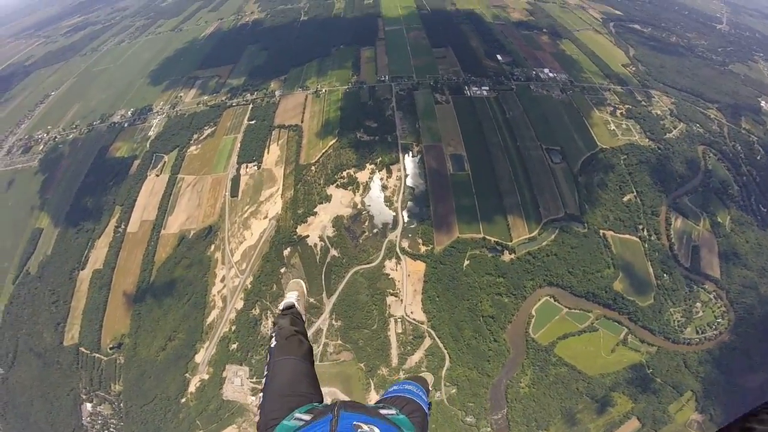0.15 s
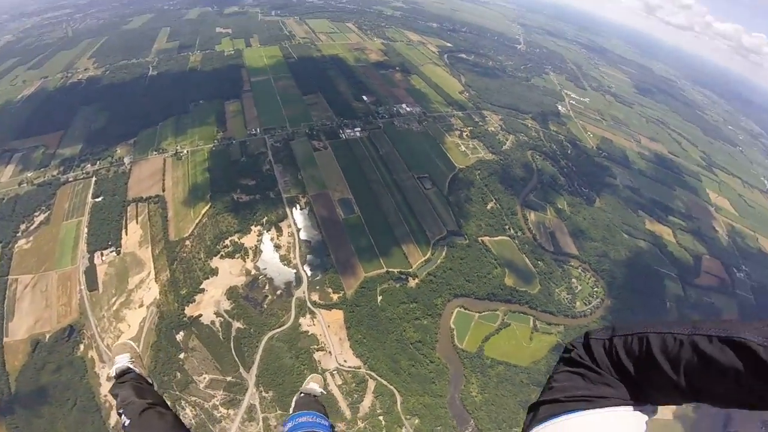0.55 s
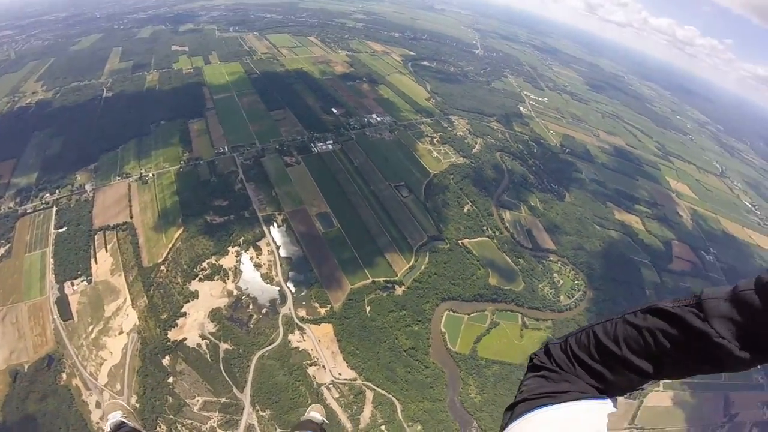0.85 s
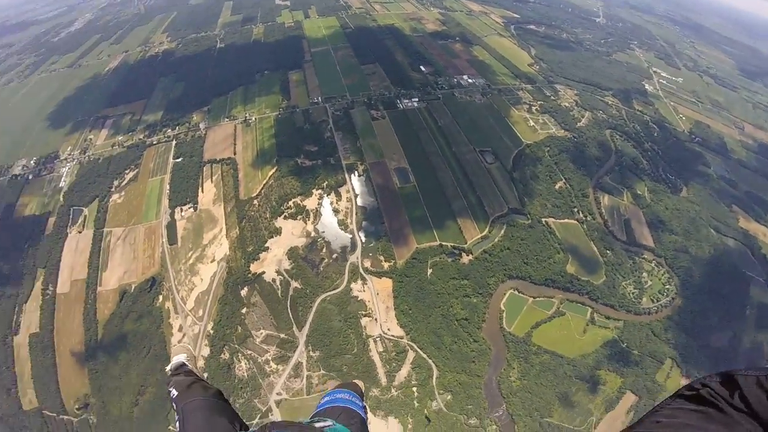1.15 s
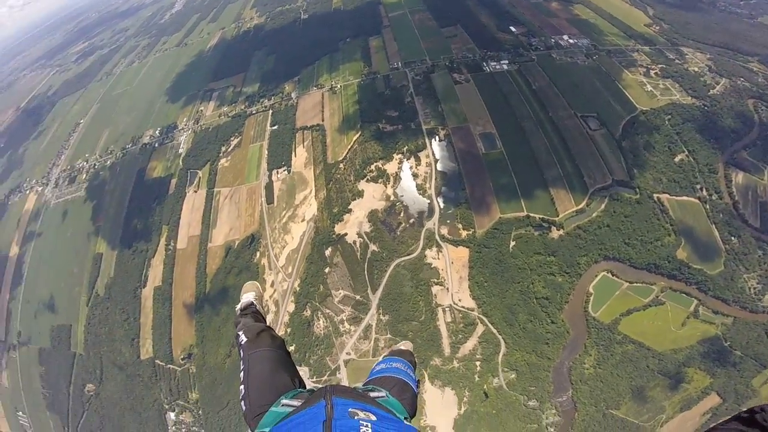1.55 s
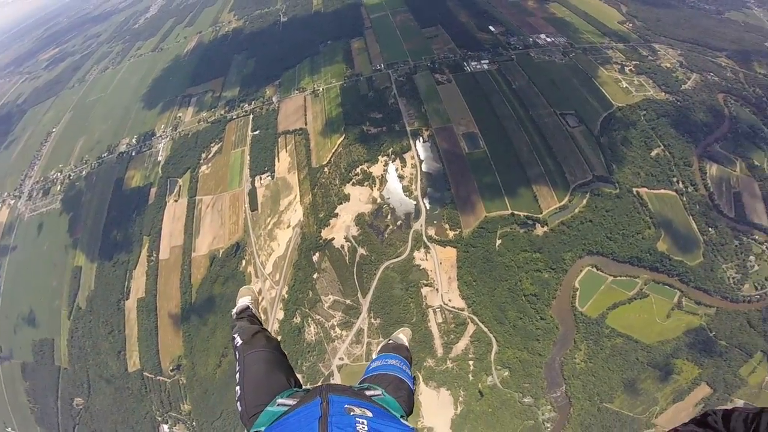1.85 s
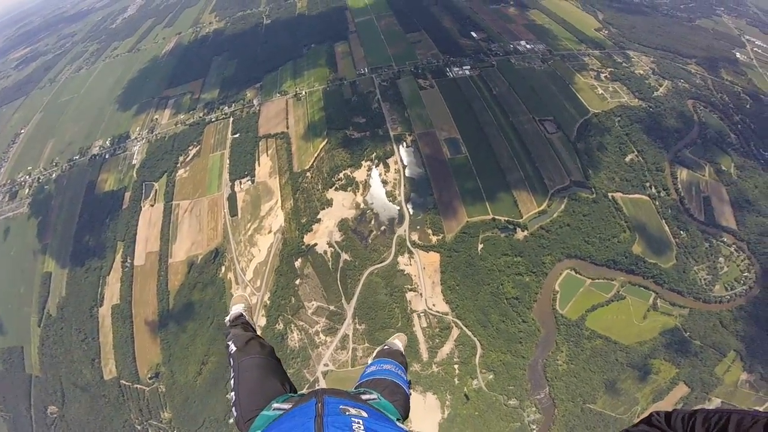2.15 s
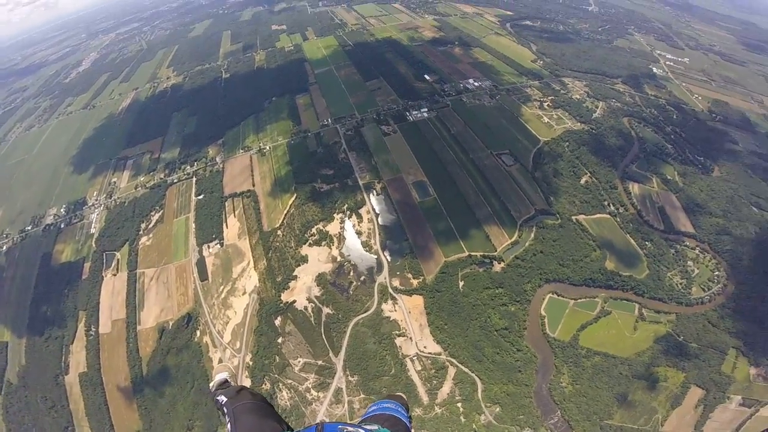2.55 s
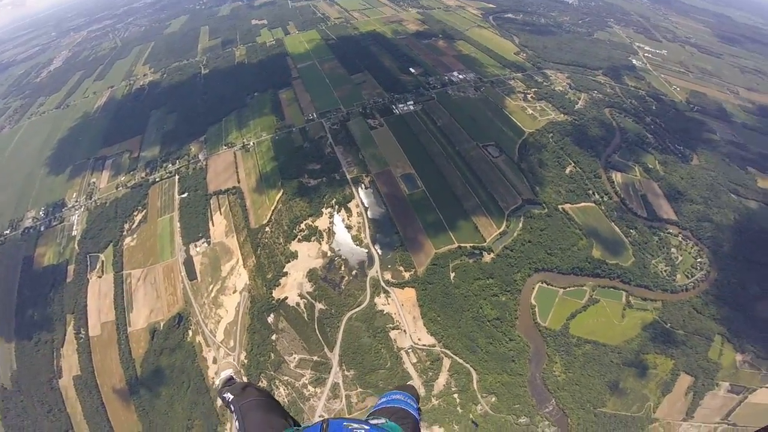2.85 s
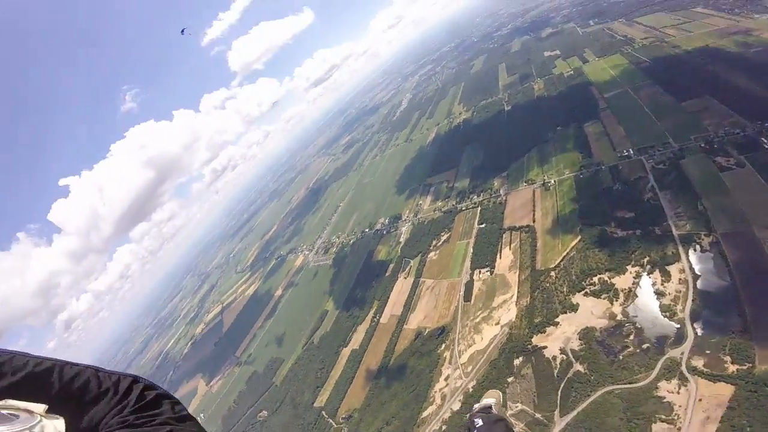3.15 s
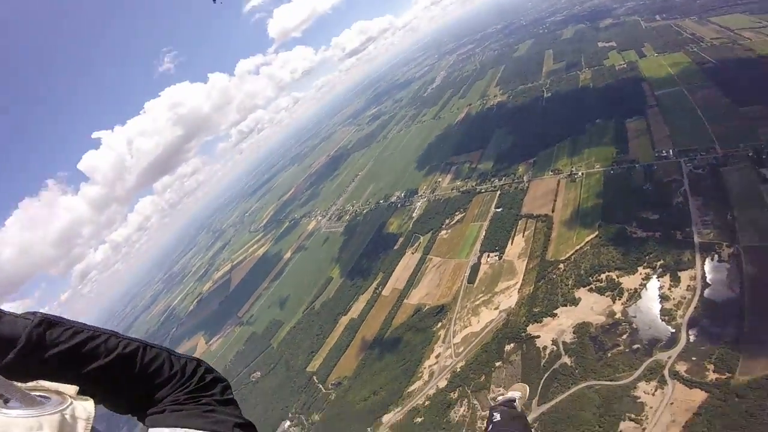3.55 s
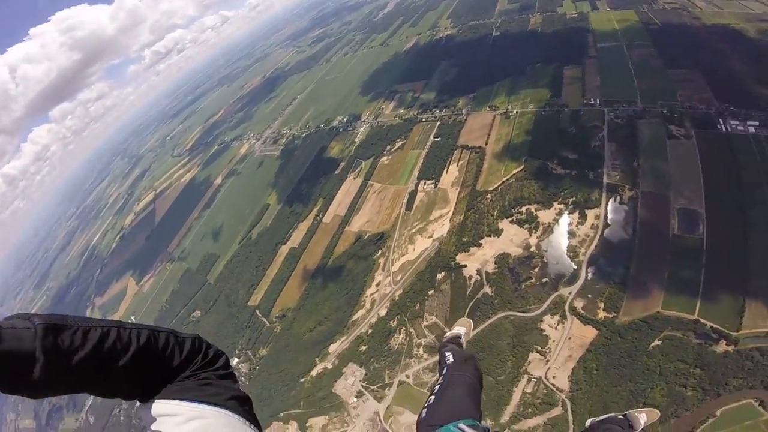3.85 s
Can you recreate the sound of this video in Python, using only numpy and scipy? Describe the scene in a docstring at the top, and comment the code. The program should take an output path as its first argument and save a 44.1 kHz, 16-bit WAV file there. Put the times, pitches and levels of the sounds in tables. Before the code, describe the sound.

Violent wind roar with rapid sharp slaps and low rumble hits a skydiver's helmet camera for about a second, then drops to a much quieter, steadier rush with faint whistles and swelling hiss.

```python
"""Sharp buffets slap a camera housing on a skydiver's helmet for the first second, over a rough roar and rumble.
Freefall then settles to a steadier rush, with thin edge whistles and a hiss that swells as the head turns.
Roar, hiss, rumble and dull wash are coloured noise with fluttering levels; howl and whistles are unsteady tones.
Each buffet is a shaped burst of noise: a ring of the housing, a thud and a crack, trailed by a brief wake."""
import sys
import numpy as np
from scipy import signal
from scipy.fft import rfft, irfft
from scipy.io import wavfile

SR = 44100
rng = np.random.default_rng(int(sys.argv[2]) if len(sys.argv) > 2 else 0)


def int16_out(signal):
    """Quantize to a 16-bit WAV file."""
    q = np.round(np.clip(np.atleast_2d(signal).T, -1, 1) * 32767)
    wavfile.write(sys.argv[1], SR, q.astype(np.int16))


N = 176400  # 4 s


def undb(db):
    """Decibels to gain."""
    return 10 ** (np.asarray(db) / 20)


def unit(x):
    """Scale to rms 1."""
    return x / np.sqrt(np.mean(x ** 2))


def curve(rows, axis=1):
    """One column of a table, joined by straight lines in time."""
    rows = np.array(rows)
    return np.interp(np.arange(N) / SR, rows[:, 0], rows[:, axis])


def resonance(hz, width_hz, db):
    """A lift in dB around one frequency, down to half its dB one width away."""
    freqs = np.fft.rfftfreq(N, 1 / SR)
    return db / (1 + ((freqs - hz) / width_hz) ** 2)


def noise(colour, lift_db=0):
    """White noise filtered to a colour table plus a lift, at rms 1."""
    hz, db = np.array(colour).T
    freqs = np.maximum(np.fft.rfftfreq(N, 1 / SR), 1)
    gain = undb(np.interp(np.log(freqs), np.log(hz), db) + lift_db)
    return unit(irfft(rfft(rng.standard_normal(N)) * gain, N))


def walk(hz):
    """Smooth random movement of rms 1: noise rolled off steeply above the given rate."""
    freqs = np.fft.rfftfreq(N, 1 / SR)
    return unit(irfft(rfft(rng.standard_normal(N)) / (1 + (freqs / hz) ** 4), N))


# Pressure on the housing: time_s [s], level_db [dB, before RUMBLE_TRIM_DB]
RUMBLE_LEVEL = [(0, -23.5), (.25, -28), (.52, -29.5), (.65, -27), (.72, -18), (.79, -24.5), (.97, -22),
                (1.19, -28), (1.28, -35), (1.6, -36), (2.1, -38), (2.5, -41.5), (2.78, -41), (2.85, -38),
                (2.94, -42.5), (3.22, -37), (4, -34.5)]
# Colour of the rumble: freq_hz [Hz], relative_db [dB per Hz]
RUMBLE_COLOUR = [(12, -2), (25, -1.5), (40, -1), (55, -8), (78, -3.5), (100, 0), (125, 1), (160, -8),
                 (200, -10), (235, -9), (310, -18), (500, -23), (1000, -34.5), (3000, -83)]
# Dull low-middle rush: time_s [s], level_db [dB]
WASH_LEVEL = [(0, -54), (1.2, -52), (1.7, -47.5), (2.2, -49.5), (2.8, -47.5), (3.25, -54.5), (4, -52)]
# Colour of the dull rush: freq_hz [Hz], relative_db [dB per Hz]
WASH_COLOUR = [(80, -24), (170, 4.5), (290, -3.5), (400, -0.5), (650, -8.5), (1000, -19), (3000, -51)]
RUMBLE_TRIM_DB = -0.5


def rumble():
    """Large eddies press on the housing; smaller ones add a dull rush above the rumble."""
    pressure = unit(noise(RUMBLE_COLOUR) * undb(1.16 * walk(hz=15)))
    wash = unit(noise(WASH_COLOUR) * undb(1.8 * walk(hz=25)))
    return pressure * undb(curve(RUMBLE_LEVEL) + RUMBLE_TRIM_DB) + wash * undb(curve(WASH_LEVEL))


WOBBLE_HZ, WOBBLE_SHARE = 6.93, 0.01202  # unsteady airspeed bends the tones; rms share of pitch


def edge_tone(rows, width_hz):
    """Vortices shed from an edge: a tone of some width whose pitch follows the local airspeed."""
    pitch_hz = curve(rows) * (1 + WOBBLE_SHARE * walk(WOBBLE_HZ))
    phase = 2 * np.pi * np.cumsum(pitch_hz) / SR
    # two independent random envelopes spread the tone into a narrow band
    tone = walk(width_hz / 2) * np.cos(phase) + walk(width_hz / 2) * np.sin(phase)
    return unit(tone) * undb(curve(rows, axis=2))


# Thin whistles: time_s [s], pitch_hz [Hz, before the wobble], level_db [dB]
LOW_WHISTLE = [(0, 1296, -48.5), (1.4, 1248, -50), (1.5, 1185, -54), (1.65, 1089, -47.5), (2, 1107, -56),
               (2.27, 1117, -49.5), (2.36, 1032, -56), (2.6, 1036, -67), (3, 926.6, -59), (4, 920, -82)]
HIGH_WHISTLE = [(0, 1320, -34), (1.3, 1341, -43), (2.1, 1295, -56), (2.37, 1302, -47), (2.45, 1245, -56),
                (2.56, 1295, -44), (2.66, 1270, -56), (2.73, 1320, -34), (2.8, 1319, -63), (4, 1356, -69)]
WHISTLE_WIDTH_HZ = 27


def whistles():
    """Two narrow edge tones, each with its own wobble."""
    return edge_tone(LOW_WHISTLE, WHISTLE_WIDTH_HZ) + edge_tone(HIGH_WHISTLE, WHISTLE_WIDTH_HZ)


# Howl of air over an edge: time_s [s], pitch_hz [Hz, before the wobble], level_db [dB, before the trim]
HOWL = [(0, 1480, -28), (.35, 1480, -24), (.9, 1480, -34), (1.25, 1400, -46), (1.4, 1412, -31),
        (1.55, 1540, -32.5), (1.77, 1545, -37), (1.88, 1540, -35.5), (2.1, 1550, -37), (2.2, 1439, -44),
        (2.8, 1465, -49), (4, 1450, -49)]
HOWL_WIDTH_HZ, HOWL_TRIM_DB = 302, -0.5


def howl():
    """Air over an edge sheds vortices irregularly, giving a broad, breathy tone."""
    return undb(HOWL_TRIM_DB) * edge_tone(HOWL, HOWL_WIDTH_HZ)


# Roar of the rough flow: time_s [s], level_db [dB, before ROAR_TRIM_DB]
ROAR_LEVEL = [(0, -26), (.15, -29), (.3, -28.5), (.42, -26.5), (.455, -34), (.53, -28.5), (.66, -30.5),
              (.75, -32.5), (.83, -30), (.91, -34.5), (.98, -30.5), (1.07, -35.5), (1.2, -41),
              (1.45, -42.5), (1.75, -44.5), (2.08, -43.5), (2.43, -49.5), (2.8, -47), (3.2, -50),
              (3.6, -51.5), (4, -46.5)]
# Colour of the housing in roar and buffet rings: freq_hz [Hz], relative_db [dB per Hz]
HOUSING_COLOUR = [(150, -18), (300, -13.5), (430, -8), (600, -18), (850, -17), (1150, -12), (1340, -1.5),
                  (1550, -2.5), (1850, -6.5), (2180, -10), (2450, -4), (2680, -4), (3000, -19.5),
                  (3350, -16), (3850, -20), (4300, -29), (4900, -39), (5500, -29.5), (5800, -35),
                  (6050, -26), (6350, -27.5), (6750, -39.5), (7500, -34.5), (7750, -44.5), (8150, -33.5),
                  (8650, -44.5), (9000, -40), (9500, -46.5), (12000, -50.5), (15000, -60)]
# Hiss of the smooth flow: time_s [s], level_db [dB, before HISS_TRIM_DB]
HISS_LEVEL = [(0, -48), (1.1, -46.5), (1.5, -44), (2.1, -49.5), (2.28, -41.5), (2.43, -48), (2.51, -42.5),
              (2.58, -47), (2.7, -42), (2.9, -43.5), (2.99, -53), (3.08, -40), (3.16, -55), (3.26, -49.5),
              (3.36, -38), (3.62, -36.5), (3.69, -33), (3.76, -46.5), (3.95, -39.5), (4, -41.5)]
# Colour of the hiss: freq_hz [Hz], relative_db [dB per Hz]
HISS_COLOUR = [(500, -21), (1100, -24.5), (1400, -12), (2150, -14.5), (2550, 1.5), (2750, -4), (3000, -11),
               (3350, -4), (3600, -6.5), (3900, -20.5), (4400, -25), (4950, -36.5), (5500, -28.5),
               (5750, -28), (6050, -20.5), (6350, -23.5), (6750, -40), (7300, -35), (9000, -44.5),
               (15000, -58)]
# Fine treble sizzle: time_s [s], level_db [dB]
SIZZLE_LEVEL = [(0, -39), (.1, -49), (.7, -46.5), (.85, -40.5), (1.07, -43.5), (1.2, -53.5), (1.6, -81),
                (4, -76)]
# Colour of sizzle and buffet cracks: freq_hz [Hz], relative_db [dB per Hz]
CRACK_COLOUR = [(1000, -19), (3500, 11), (4800, 0.5), (5700, 0), (6300, 1.5), (6800, -6), (8100, 2),
                (9300, -10.5), (15000, -29)]
ROAR_TRIM_DB, HISS_TRIM_DB = 6.5, -1
FLUTTER_HZ, FLUTTER_DB = 44.5, 0.66  # slower eddies: rate, rms depth
GRAIN_HZ, GRAIN_DB = 485, 0.9  # faster eddies: rate, rms depth


def rush():
    """Eddies flutter on the housing and ring it; the same flutter stirs the smoother hiss and fine sizzle."""
    eddies_db = FLUTTER_DB * walk(FLUTTER_HZ) + GRAIN_DB * walk(GRAIN_HZ)
    roar = unit(noise(HOUSING_COLOUR) * undb(eddies_db))
    hiss = unit(noise(HISS_COLOUR) * undb(.6 * eddies_db))
    bright = noise(CRACK_COLOUR, resonance(hz=6100, width_hz=400, db=7))
    sizzle = unit(bright * undb(.7 * eddies_db))
    return (roar * undb(curve(ROAR_LEVEL) + ROAR_TRIM_DB)
            + hiss * undb(curve(HISS_LEVEL) + HISS_TRIM_DB)
            + sizzle * undb(curve(SIZZLE_LEVEL)))


# Buffets: start_s [s], level_db [dB, before BUFFET_TRIM_DB], length_s [s], ring_hz [Hz],
# thud_db and crack_db [dB relative to level_db], crack_hz [Hz]
BUFFETS = [(.007, -16, 0.012, 1550, -5, -15.5, 6200), (.068, -9, 0.0062, 1700, -10.5, -19, 6200),
           (.141, -11.5, 0.0084, 1550, -19, -19.5, 8000), (0.207, -10, 0.0064, 1440, -13, -14, 6240),
           (0.215, -14.5, .008, 1800, -14, -29, 8100), (.347, -8.5, 0.012, 1560, -22, -34, 6200),
           (0.409, -10, 0.0043, 1770, -27, -14, 3800), (0.497, -14, 0.0055, 1470, -30, -30, 3800),
           (.551, -13, 0.0071, 1370, -13.5, -19.5, 6200), (0.558, -14, 0.0091, 1520, -1, -24, 3800),
           (0.621, -15, 0.014, 1800, -8, -15.5, 6400), (0.695, -12.5, 0.0053, 1430, -15, -10, 6300),
           (0.705, -6, 0.0031, 1360, -17, -27, 6300), (.797, -23.5, 0.0048, 1500, 2, -19, 3800),
           (.868, -8, 0.0066, 2550, -10.5, -18.5, 8000), (0.948, -16, 0.0065, 1540, -3.5, -17, 8300),
           (1.034, -26.5, 0.013, 1500, 0.5, -22, 3800), (1.057, -17.5, 0.013, 1560, -19, -38, 3800),
           (1.268, -23, 0.0052, 1590, -20, -34, 3800), (2.623, -28, 0.0066, 1450, -26, -40, 3800),
           (2.858, -36, .012, 2380, -10, -34, 3800)]
# Colour of a buffet's thud: freq_hz [Hz], relative_db [dB per Hz]
THUD_COLOUR = [(40, -22), (110, 10), (230, -15), (400, 4.5), (650, -4), (1000, -7.5), (2500, -49)]
BUFFET_TRIM_DB = -2.5
RING_WIDTH_HZ, RING_LIFT_DB = 240, 8.5
CRACK_WIDTH_HZ, CRACK_LIFT_DB = 520, 7.5
ATTACK_SHARE = 0.29  # rise as a share of each part's length
WAKE_S, WAKE_DB = 0.023, -9  # decay time and level of the trailing turbulence


def buffets():
    """Each slap of air is a short crack, a ring of the housing and a thud, trailed by a brief wake."""
    out, t = np.zeros(N), np.arange(N) / SR
    thud = noise(THUD_COLOUR)
    for start, level_db, length, ring_hz, thud_db, crack_db, crack_hz in BUFFETS:
        span = (t >= start) & (t < start + .1)
        age = t[span] - start
        ring = noise(HOUSING_COLOUR, resonance(ring_hz, RING_WIDTH_HZ, RING_LIFT_DB))
        crack = noise(CRACK_COLOUR, resonance(crack_hz, CRACK_WIDTH_HZ, CRACK_LIFT_DB))
        parts = (ring, 0, length), (thud, thud_db, 0.92 * length), (crack, crack_db, 0.84 * length)
        for source, part_db, hold in parts:
            rise = np.sin(np.pi / 2 * np.minimum(age / (ATTACK_SHARE * hold), 1)) ** 2
            slap = np.exp(-(age / hold) ** 2)
            wake = undb(WAKE_DB) * np.exp(-age / WAKE_S)
            shape = rise * (slap + wake)
            # give every burst the energy of its shape, whatever the noise drew
            burst = unit(source[span] * shape) * np.sqrt(np.mean(shape ** 2))
            out[span] += burst * undb(level_db + part_db + BUFFET_TRIM_DB)
    return out


def scene():
    """All the airflow at one microphone."""
    return (rumble() + whistles() + howl() + rush() + buffets())[None]


TOP_HZ = 15250


def record(dry):
    """The camera rounds the highest peaks and cuts the top."""
    rounded = dry / (1 + dry ** 4) ** (1 / 4)
    top_cut = signal.ellip(10, .2, 80, TOP_HZ, fs=SR, output="sos")
    return signal.sosfilt(top_cut, rounded)


dry = scene()
out = record(dry)
int16_out(out)
```